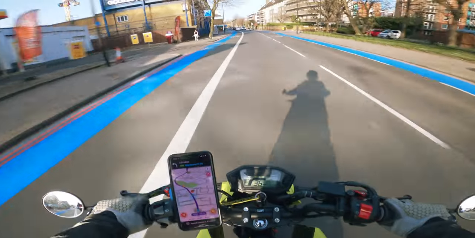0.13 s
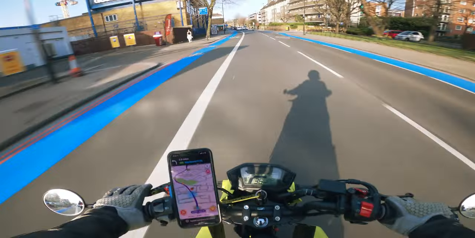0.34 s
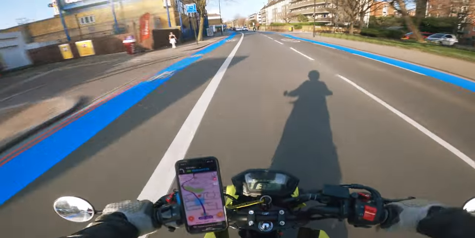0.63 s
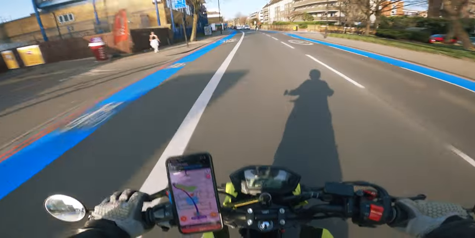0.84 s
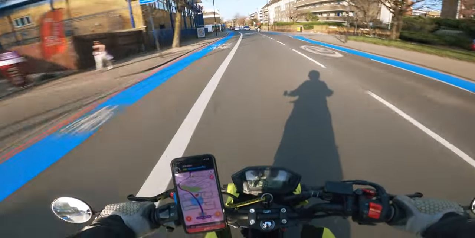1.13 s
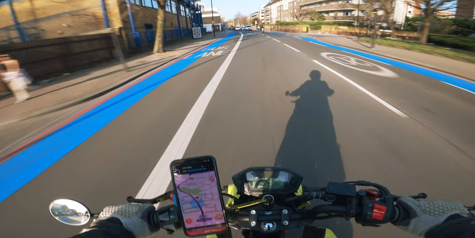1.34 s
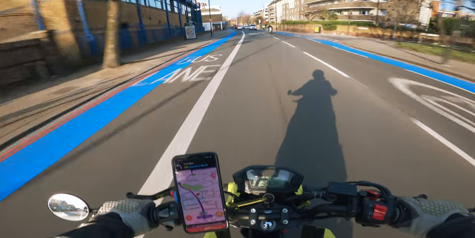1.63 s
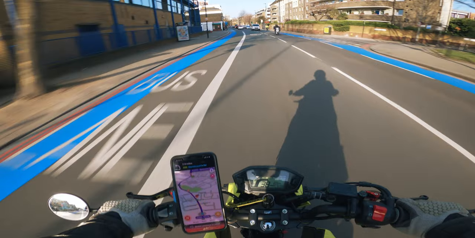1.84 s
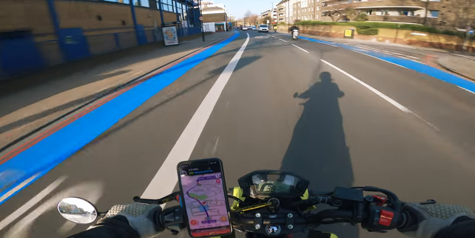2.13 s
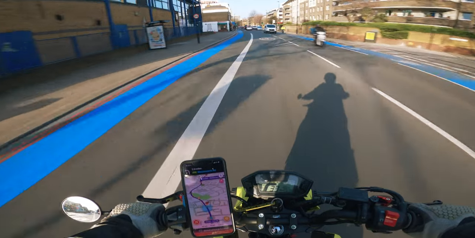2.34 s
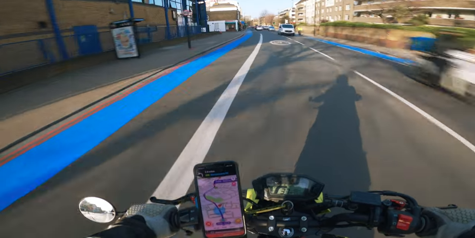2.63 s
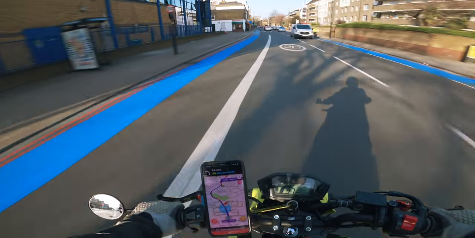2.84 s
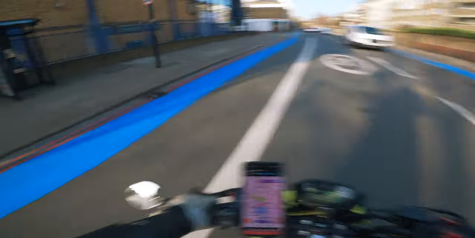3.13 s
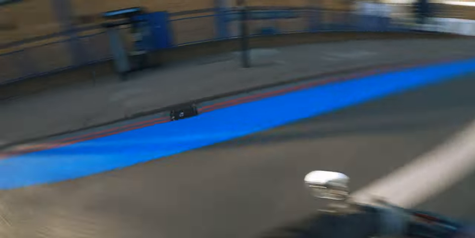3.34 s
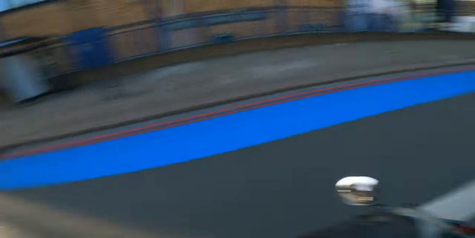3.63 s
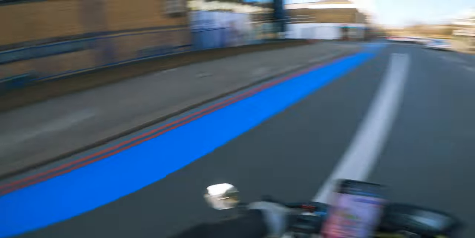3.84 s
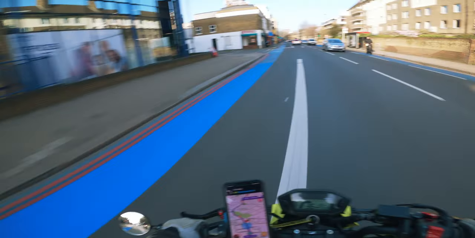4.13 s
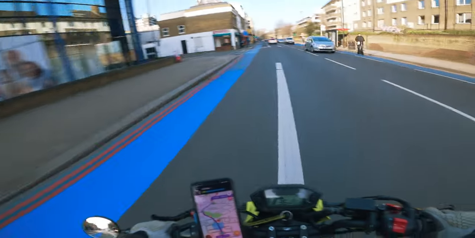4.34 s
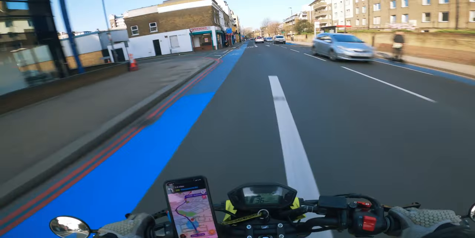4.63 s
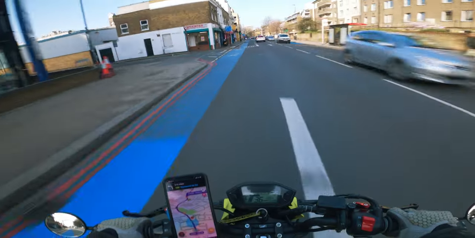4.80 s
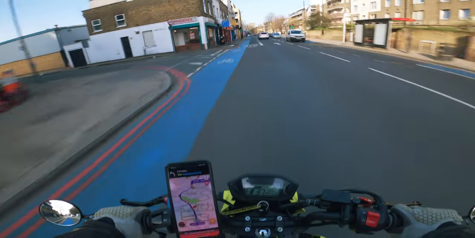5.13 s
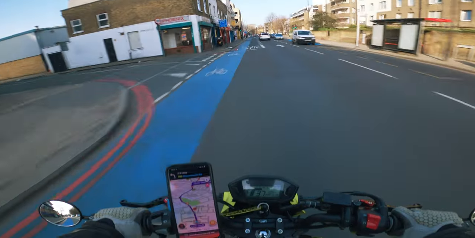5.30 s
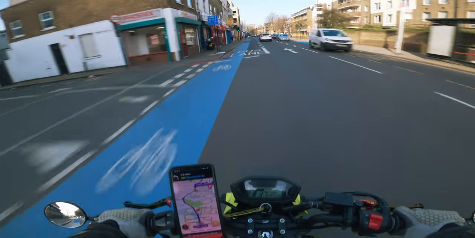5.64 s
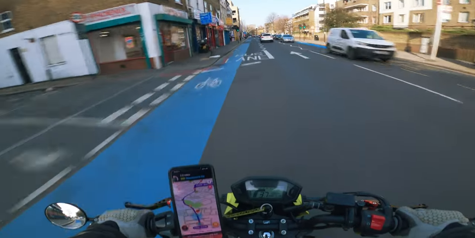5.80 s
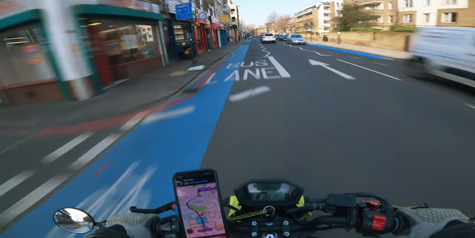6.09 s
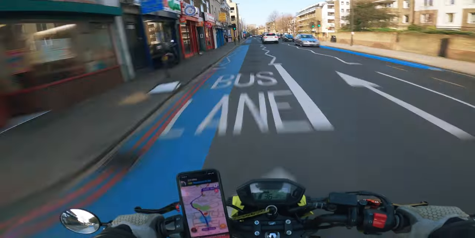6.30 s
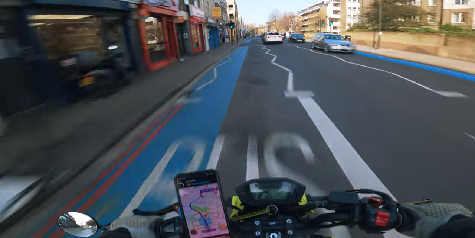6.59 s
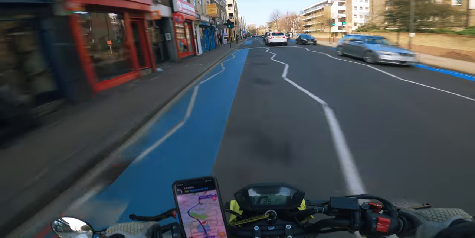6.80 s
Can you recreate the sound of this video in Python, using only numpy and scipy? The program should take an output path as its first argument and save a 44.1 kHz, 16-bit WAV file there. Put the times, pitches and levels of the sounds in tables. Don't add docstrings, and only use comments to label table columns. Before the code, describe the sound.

A little motorbike engine putters rapidly, heard by a windshielded stereo microphone on the helmet, exhaust leaning left. Loud and buzzy at first, it drops in pitch after a quick gear change, purrs, goes dull off throttle, barks moderately again and fades to coasting. Wind gusts rumble, the road rushes behind, and soft swishes of traffic pass.

```python
import sys
import numpy as np
from scipy import signal
from scipy.fft import rfft, irfft, next_fast_len
from scipy.io import wavfile
from scipy.ndimage import uniform_filter1d, map_coordinates

SR = 44100
rng = np.random.default_rng(int(sys.argv[2]) if len(sys.argv) > 2 else 0)


def ratio(d):
    e = np.asarray(d, float) / 20
    return 10 ** e


def wav_out(sig):
    wavfile.write(sys.argv[1], SR, np.round(np.clip(np.atleast_2d(sig).T, -1, 1) * 32767).astype(np.int16))


N = 306936
EARLY = 4096
CRUISE = 43

# start_s, firings_per_s
SPEED = [(0, 56.55), (.424, 59.24), (.598, 54.1), (.69, 56.05), (.8, 43.1), (.846, 44.19), (1.769, 45.5),
         (2.309, 43.45), (2.35, 44.11), (3.384, 41.3), (3.58, 42.67), (3.718, 41.57), (5.412, 43.35),
         (6.388, 42.31), (6.58, 40.08), (6.66, 41.92), (6.8, 40.87), (6.96, 41.48)]
# start_s, load
THROTTLE = [(0, 1), (.442, 0.98), (.503, -1.1), (.676, -1), (.745, 0.63), (1.58, 0.59), (2.265, -.73),
            (2.345, -1.02), (3.432, -0.92), (3.472, -.51), (3.585, -0.066), (4.04, 0.58), (5.44, 0.44),
            (5.855, -0.021), (5.965, -.47), (6.486, -.51), (6.56, -0.91), (6.96, -.88)]


def unit(x):
    return x / np.sqrt(np.mean(x ** 2) + 1e-20)


def along(points, hz):
    f, v = np.transpose(points)
    return np.interp(np.log(hz + 1), np.log(f + 1), v)


def curve(rows):
    s, value = np.transpose(rows)
    return np.interp(np.arange(N) / SR, s, value)


def wobble(rate):
    knots = rng.standard_normal(int(N * rate / SR) + 4)
    return map_coordinates(knots, [np.arange(N) * rate / SR])


def bell(start_s, length_s):
    return np.exp(-((np.arange(N) / SR - start_s) / length_s) ** 2)


def swells(rows):
    return sum(db * bell(s, length) for s, db, length in rows)


def filtered(x, response):
    m = next_fast_len(x.shape[-1] + SR // 2)
    return irfft(rfft(x, m) * response(np.fft.rfftfreq(m, 1 / SR)), m)[..., :x.shape[-1]]


def resonances(modes, f):
    total = 0
    for k, (centre, width, db) in enumerate(modes):
        damping = 1j * f * width
        total = total + (-1) ** k * ratio(db) * damping / (centre * centre - f * f + damping)
    return total


def engine():
    loads = [-1, -.87, -.72, -.5, -.25, 0, .5, .7, 1]
    # boom_db, thud_db, bark_db, rasp_db
    part_db = [(-23.5, -29.2, -37, -49.5), (-22.5, -30.5, -40, -51), (-23.5, -30.5, -44.5, -55.5),
               (-26, -38, -44, -57.5), (-27.5, -37, -39.5, -55.5), (-33, -37.5, -35, -53),
               (-28.5, -33.5, -28.5, -48.5), (-24.5, -30.5, -26.5, -41.5), (-25.5, -29, -28, -34.5)]
    # boom_db, thud_db, bark_db, rasp_db
    revs_db = [2.2, 5.5, 13, 5]

    n = N + 2 * EARLY
    clock = (np.arange(n) - EARLY) / SR
    load = np.interp(clock, *np.transpose(THROTTLE))
    speed = np.interp(clock, *np.transpose(SPEED))
    octaves = np.log2(speed / CRUISE)
    boom_db, thud_db, bark_db, rasp_db = (
        np.interp(load, loads, levels) + gain * octaves
        for levels, gain in zip(np.transpose(part_db), revs_db))

    hot = np.clip((load + .4) / .5, 0, 1)
    lit = np.clip(6 * hot, 0, 1)
    turns = np.cumsum(speed) / SR
    cycle = turns - turns[EARLY] + .94
    fired = np.flatnonzero(np.diff(np.floor(cycle)) > 0)
    jitter, burn, kick_luck, crest_luck, front_luck, gas_luck, thud_luck = rng.standard_normal((7, len(fired)))
    fired = fired + np.round(.00006 * SR * jitter).astype(int)
    burn_db = .65 * burn
    cool_late = round(.0035 * SR)

    def blows(scatter_db, late):
        arrivals = np.clip(fired + round(late * SR), 0, n - 1)
        return np.bincount(arrivals, ratio(burn_db + scatter_db), n)

    def blast(hits, response, rough, prompt):
        turbulence = rough * np.sqrt(np.mean(hits ** 2)) * rng.standard_normal(n)
        x = filtered(hits + turbulence, response)
        x = x / np.sqrt(np.abs(uniform_filter1d(x ** 2, size=SR // 3)) + 1e-20)
        return prompt * x + (1 - prompt) * np.roll(x, cool_late)

    def boom():
        # centre_hz, width_hz, level_db
        silencer = [
            [(139, 52, 0)],
            [(152, 80, 0)],
        ]
        skirt = lambda f: (1j * f / (75 + 1j * f)) ** 2 * np.exp(-(f / 240) ** 2 - (50 / (f + 1)) ** 3)
        kicks = blows(.5 * kick_luck, late=.0007)
        cool, warm = (
            blast(kicks, lambda f: resonances(modes, f) * skirt(f), rough=.07, prompt=hot)
            for modes in silencer)
        cool = filtered(cool, lambda f: 1 / (1 + (85 / (f + 1)) ** 6))
        return ratio(boom_db - 0.88) * ((1 - hot) * cool + hot * warm)

    def thud():
        # pitch_hz, level_db
        slow_part = [(100, -54.5), (160, -3.5), (205, 8.5), (255, 11), (310, 6.5), (380, -16), (600, -68)]
        hits = blows(.5 * thud_luck, late=0)
        return ratio(thud_db) * blast(hits, lambda f: ratio(along(slow_part, f)), rough=.08, prompt=hot)

    def bark():
        # pitch_hz, level_db
        tailpipe = [(200, -53.5), (300, -6.5), (390, 6), (480, 2), (560, -1.5), (640, -22), (900, -84.5)]
        hits = blows(.4 * crest_luck, late=0)
        crest = blast(hits, lambda f: ratio(along(tailpipe, f)), rough=.06, prompt=lit)
        dull = filtered(crest, lambda f: 1 / (1 + (f / 675) ** 8))
        return ratio(bark_db) * (lit * crest + (1 - lit) * dull)

    def rasp():
        # pitch_hz, level_db
        outlet = [(520, -52), (640, -3), (720, 4), (790, -3.5), (870, -1.5), (960, -12), (1060, -5),
                  (1150, -16), (1300, -25.5), (1700, -56)]
        hits = blows(.8 * front_luck, late=-.0011)
        return -ratio(rasp_db) * blast(hits, lambda f: ratio(along(outlet, f)), rough=.1, prompt=lit)

    def frame_shake():
        crank = hot * ratio(-46) * np.cos(4 * np.pi * cycle + 2.8)
        firing = ratio(-59) * np.cos(2 * np.pi * cycle + 2.3)
        return ratio(40.5 * octaves) * (crank + firing)

    def gas_puff():
        # pitch_hz, level_db_per_hz
        gas = [(900, -30.5), (1500, 11.5), (2100, 4.5), (2600, -3), (3300, -8.5), (4500, -14.5),
               (5800, -19), (6800, -20.5), (8200, -17.5), (11000, -27.5), (15000, -45)]
        # centre_hz, width_hz, level_db
        tip_ring = [(2980, 560, -8)]
        spit_db = -77.5 + 0.42 * (rasp_db + 42.0) + 0.51 * (bark_db + 29.0)
        t = np.arange(SR // 40) / SR
        puff = (t / 0.0014) * np.exp(-t / 0.0012) + 0.15 * np.exp(-t / 0.013)
        gate = signal.fftconvolve(blows(1.6 * gas_luck, late=-.0022), puff)[:n]
        colour = lambda f: ratio(along(gas, f)) * (1 + resonances(tip_ring, f))
        jet = filtered(gate * rng.standard_normal(n), colour)
        dull = filtered(np.roll(jet, cool_late), lambda f: 1 / (1 + (f / 4200) ** 6))
        top = filtered(jet, lambda f: (f > 4500) & (f < 11000))
        spit = hot * jet + (1 - hot) * ratio(3.5) * dull
        return ratio(spit_db) * spit / np.sqrt(np.mean(top ** 2))

    return boom() + thud() + bark() + frame_shake() + rasp() + gas_puff()


def driveline():
    # start_s, turns_per_s
    shaft = [(0, 37.4), (.45, 38.6), (.8, 29.6), (1.2, 30.73), (2, 31.22), (2.9, 30.3), (3.4, 30.35),
             (4, 29.7), (4.6, 29.57), (5.5, 31.2), (6.4, 30.85), (6.96, 29.6)]
    # multiple, level_db
    shaft_orders = [(2, -56), (3, -45), (5, -37), (6, -43)]
    # start_s, level_db (at the fifth multiple), length_s
    shaft_lulls = [
        (.2, 1.5, .3),
        (3.2, -1, 0.46),
        (4.4, -12, .4),
        (6.75, -6, 0.18),
    ]
    level_db = swells(shaft_lulls)
    angle = 2 * np.pi * (.81 + np.cumsum(curve(shaft)) / SR)
    drone = np.zeros(N)
    for k, db in shaft_orders:
        gain = ratio(db + 3 + level_db * (k - 2) / 3 + 1.5 * wobble(3))
        drone += gain * np.sin(k * angle + .2 * wobble(3.7))
    return drone


def squeaks():
    # start_s, level_db, length_s, pitch_hz
    chirps = [
        (2.846, -72, 0.0054, 9150),
        (2.887, -93, .005, 9250),
        (2.904, -65.5, 0.009, 9050),
        (2.93, -88, .005, 9300),
    ]
    t, out = np.arange(N) / SR, np.zeros(N)
    for s, db, length, hz in chirps:
        out += ratio(db) * bell(s, length) * np.sin(2 * np.pi * hz * t + 1.4 * wobble(450))
    return out


def rush(spectrum, patchy_db):
    # pitch_hz, left_right_likeness
    alike = [(40, 0.45), (150, 0.35), (600, 0.97), (1500, 0.1), (5000, 0.16)]
    z = signal.stft(rng.standard_normal((2, N)), nperseg=512)[2]
    field = rng.standard_normal(z.shape[1:])
    field = uniform_filter1d(uniform_filter1d(field, 6, 0), 14, 1)
    pair = signal.istft(z * ratio(patchy_db * unit(field)), nperseg=512)[1][:, :N]

    def mid_side(hz):
        turn = np.arccos(np.clip(along(alike, hz), -1, 1)) / 2
        return ratio(along(spectrum, hz)) * [np.cos(turn), np.sin(turn)]

    mid, side = filtered(pair, mid_side)
    return unit(np.array([mid + side, mid - side]))


def street_rush():
    # pitch_hz, level_db_per_hz
    road = [(150, -30), (300, -12), (450, -18.5), (640, -20), (900, -26.5), (1300, -32), (1700, -38),
            (2400, -42.5), (3300, -53), (4400, -60.5), (8000, -68.5), (11000, -76), (15000, -88)]
    load = curve(THROTTLE)
    pull_db = 6 * np.clip(load, 0, 1) ** 3
    brake_db = np.clip(-load, 0, 1) ** 3
    revs_db = 7 * np.log2(curve(SPEED) / CRUISE)
    road_db = -60 + pull_db + brake_db + revs_db
    return ratio(road_db + 12 + .5 * wobble(2.7)) * rush(road, patchy_db=1.5)


def swishes():
    # start_s, level_db, length_s, pitch_hz
    passers = [
        (.77, -63, .035, 2400),
        (.72, -50, .04, 900),
        (2.8, -73, .12, 3300),
        (3.55, -59, .15, 1250),
        (6, -63, .08, 1150),
    ]
    out = np.zeros((2, N))
    for s, db, length, hz in passers:
        band = [(hz / 3, -120), (hz / 1.6, -30), (hz, 0), (hz * 1.6, -30), (hz * 3, -120)]
        out += ratio(db) * bell(s, length) * rush(band, patchy_db=1.5)
    return out


def wind():
    # pitch_hz, level_db_per_hz
    buffet = [(15, -23.5), (30, -3), (45, 3.5), (100, 5.5), (200, -7), (400, -20), (800, -67)]
    # start_s, level_db (over calm), length_s
    gusts = [
        (.05, 6, 0.054),
        (1.3, 13.5, .75),
        (1.9, 10, 0.09),
        (2.35, 3.5, .12),
        (4.7, 9, 1.4),
        (6.95, 14, .1),
    ]
    lumps = ratio(2.4 * np.array([wobble(3.6), wobble(35)]))
    calm_db = -63
    return ratio(calm_db + swells(gusts) + 2.5) * unit(lumps * rush(buffet, patchy_db=1.5))


def scene():
    # pitch_hz, left_minus_right_db
    louder_left = [(60, 2.5), (99, 3.0), (160, 4.5), (270, 1.0), (450, 3.5), (740, 6.0), (1220, 7.5),
                   (2010, -1.5), (3330, -2.5), (5500, -3.0), (9080, -3.5), (15000, -1.0)]
    # pitch_hz, left_lead_radians
    left_lead = [(0, 0), (860, -0.9), (2240, -4.5), (4050, -7.8), (5250, -12.5), (5770, -13.0),
                 (7670, -12.5), (9300, -13.2), (10800, -12.8), (15200, -12.5)]
    f, lead = np.transpose(left_lead)

    def ports(hz):
        half = ratio(along(louder_left, hz) / 2) * np.exp(.5j * np.interp(hz, f, lead))
        return np.array([half, 1 / half])

    near = engine() + np.pad(squeaks() + driveline(), EARLY)
    bike = filtered(near, ports)[:, EARLY:-EARLY]
    background = street_rush() + wind() + swishes()
    return bike + background * ratio([[2.2], [-2.2]])


def band_limit(x):
    return signal.sosfilt(signal.butter(12, 15630, fs=SR, output="sos"), x)


def record(dry):
    mix = filtered(dry, lambda f: 1 / (1 + (f / 11500) ** 6))
    return band_limit(mix)


dry = scene()
out = record(dry)
wav_out(out)
```